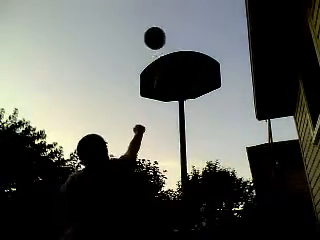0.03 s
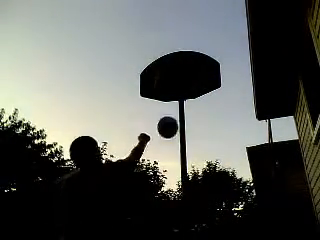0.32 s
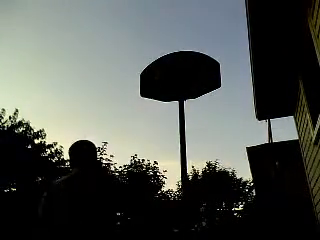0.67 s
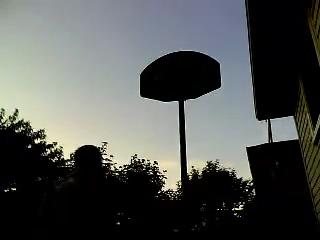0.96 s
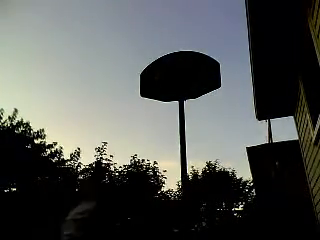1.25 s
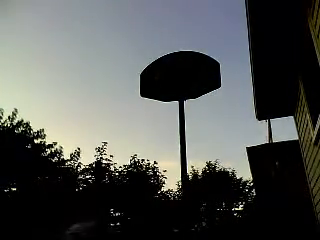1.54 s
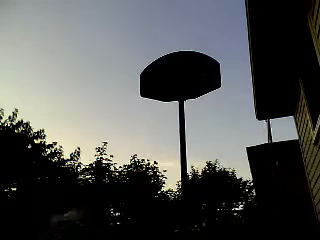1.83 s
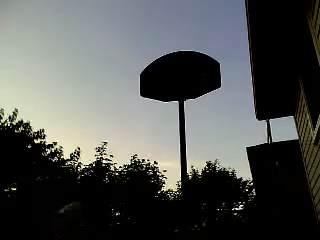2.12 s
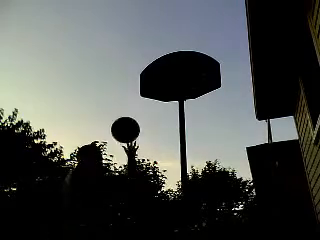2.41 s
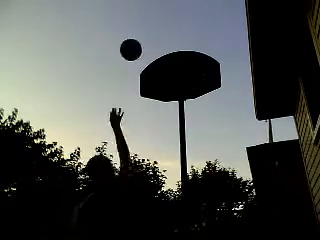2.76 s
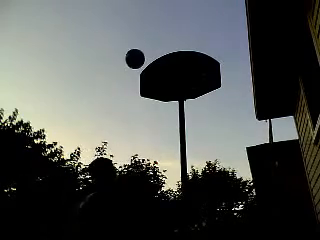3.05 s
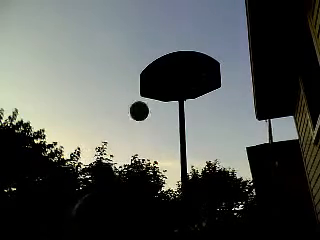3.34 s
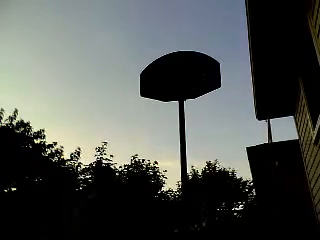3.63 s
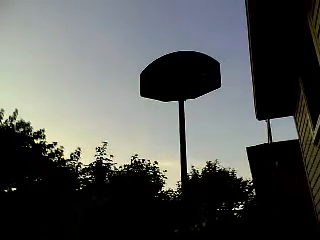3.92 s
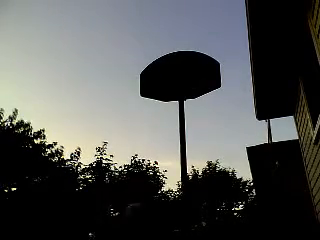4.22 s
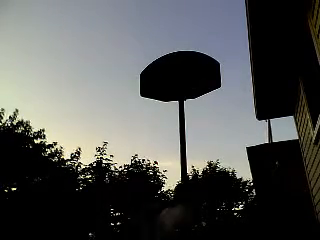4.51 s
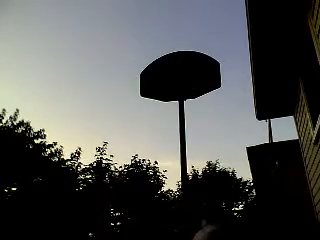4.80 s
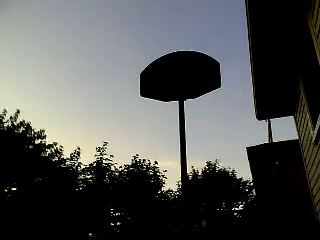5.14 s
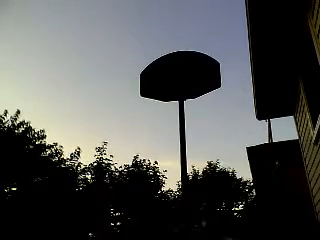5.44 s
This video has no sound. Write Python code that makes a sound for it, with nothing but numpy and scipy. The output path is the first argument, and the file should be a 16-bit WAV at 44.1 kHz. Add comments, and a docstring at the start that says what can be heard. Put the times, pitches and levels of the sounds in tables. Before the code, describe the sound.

In a backyard, a basketball thuds hard on the ground twice in quick succession, close enough to overload a small microphone slightly. Faint shoe scuffs and light hand taps on the ball follow, then a quiet stretch with only a couple of soft rubs. A third loud thud lands, and two sharp slaps on the ball finish it. A steady hiss runs underneath throughout.

```python
"""A backyard hoop, heard on a small camera's microphone over a steady hiss. Basketballs thud down hard
and close at 0.6 s and 0.8 s; each thud rings, scatters off walls and fence, overloads the microphone and
ducks its gain for a moment. From 1.1 s to 3.2 s shoes scuff and hands slap the ball, the house wall
throwing the slaps back. A third thud lands at 3.9 s. Two sharp slaps at 4.8 s and 5.4 s end the scene,
with a scuff and a soft knock between them."""
import sys
import numpy as np
from scipy import signal
from scipy.fft import rfft, irfft
from scipy.io import wavfile

SR = 44100
rng = np.random.default_rng(int(sys.argv[2]) if len(sys.argv) > 2 else 0)


def generate_wav(signal):
    """Clip the signal to [-1, 1] and save it as 16-bit WAV at the path in sys.argv[1]."""
    frames = np.transpose(np.atleast_2d(signal))
    scaled = np.clip(frames, -1, 1) * 32767
    pcm = np.round(scaled).astype(np.int16)
    wavfile.write(sys.argv[1], SR, pcm)


N = 245637
HIT_TIME = np.arange(SR // 2) / SR   # seconds since the start of one short sound
CUTOFF_HZ = 15900

# Steady hiss behind everything, spectrum: f/Hz, level/dB
HISS_SPECTRUM = [(25, -11), (90, -21), (145, -19), (215, -3), (330, -1.5), (420, -5.5), (750, -5.5),
                 (1300, -10), (3000, -13), (6000, -14.5), (7000, -18.5), (8000, -30), (10300, -43.5),
                 (12000, -54)]
# Grit in a rub, spectrum: f/Hz, level/dB
GRIT_SPECTRUM = [(200, -12), (900, -3.5), (1700, -1), (2700, 6), (3800, -4), (6500, -7), (8500, -22.5),
                 (11000, -48)]
# Crack of an impact on the ball, spectrum: f/Hz, level/dB
CRACK_SPECTRUM = [(100, 4.5), (700, -5.5), (2000, -2), (4500, -7.5), (7000, -13.5), (10000, -13),
                  (12000, -48)]
# Scatter off the walls and fence close by, spectrum: f/Hz, level/dB
SCATTER_SPECTRUM = [(30, -50), (120, -7), (240, -4), (450, 3.5), (750, 5), (1100, -5), (2000, -9),
                    (4500, -17.5), (7000, -29.5), (11000, -39), (16000, -67)]
# Dull tail that the yard returns after a thud, spectrum: f/Hz, level/dB
YARD_SPECTRUM = [(100, -20), (300, -3), (700, -7.5), (1500, -8), (3000, -13), (6000, -17), (11000, -52)]
# Shoes, clothes and the ball's skin rub: t/s, level/dB, half length/s, body f/Hz, grit/dB
RUBS = [(1.134, -31.5, 0.0089, 800, 4), (1.244, -31.5, 0.0057, 500, -0.5), (1.379, -26.5, 0.0094, 350, -12),
        (1.481, -30, 0.0067, 440, -10), (2.637, -31, 0.0082, 720, 7.5), (3.164, -36.5, 0.016, 750, -5),
        (5.063, -29.5, 0.015, 936, -2.5)]
# Hands and feet knock on the ball:
# t/s, rise/s, thump level/dB, thump f/Hz, thump t60/s, snap level/dB, snap f/Hz, snap t60/s
KNOCKS = [(1.121, 0.004, -13.5, 776, 0.034, -30, 2900, .02),
          (1.226, 0.0058, -3, 280, 0.027, -32, 2700, 0.038),
          (1.4145, 0.0019, -4, 646, 0.013, -15, 2260, 0.016),
          (2.702, 0.002, -40, 312, .03, -18, 3220, 0.015), (4.8023, 0.0015, 8, 241, 0.013, 13, 4250, 0.01),
          (5.154, 0.0043, -21, 324, 0.047, -45, 1490, .02),
          (5.4086, 0.0022, -13, 183, 0.027, 7.5, 2340, 0.017)]
# Modes of a ball and the ground under it: f/Hz, level/dB, t60/s
BALL_GROUND_MODES = [(194.2, -4, 0.16), (260.7, -9, 0.11), (319.7, -8, 0.083), (400.4, -3, 0.14),
                     (447.5, -5.5, 0.095), (557.4, -5.5, 0.095), (764, -7.5, 0.1), (864.6, -8, 0.15),
                     (933.6, -3, 0.14)]
# Balls land close to the microphone:
# t/s, level/dB, rise/s, hold by near reflections/s, fall t60/s, ring f/Hz, ring/dB, bass/dB, crack/dB
LANDINGS = [(0.6336, 11, 0.017, 0.034, 0.13, 738, -6, 0.5, -2),
            (0.829, 8.5, 0.0091, 0.047, 0.047, 735, -2, 3.5, 1.5),
            (3.8504, 9.5, 0.014, 0.052, 0.1, 616, 3, -11.5, -17)]


def from_db(db):
    """Decibels to gain."""
    return 10 ** (np.asarray(db) / 20)


def unit_power(x):
    """Scale to an RMS of 1."""
    return x / np.sqrt(np.mean(x ** 2) + 1e-20)


def low_pass(x, hz, order):
    """Butterworth low-pass, its corner at CUTOFF_HZ at most."""
    return signal.sosfilt(signal.butter(order, min(hz, CUTOFF_HZ), fs=SR, output="sos"), x)


def high_pass(x, hz):
    """Butterworth high-pass."""
    return signal.sosfilt(signal.butter(2, hz, "high", fs=SR, output="sos"), x)


def coloured(x, spectrum):
    """Shape a signal with the listed spectrum, at unit power."""
    hz, db = np.transpose(spectrum)
    bin_hz = np.maximum(np.fft.rfftfreq(len(x), 1 / SR), 1)
    gain = from_db(np.interp(np.log(bin_hz), np.log(hz), db))
    return unit_power(irfft(rfft(x) * gain, len(x)))


def noise(spectrum, size=len(HIT_TIME)):
    """Noise of unit power with the given colour."""
    return coloured(rng.standard_normal(size), spectrum)


def resonant_noise(hz, width_hz):
    """Dense random contacts through one resonance, at unit power."""
    radius = np.exp(-np.pi * width_hz / SR)
    poles = [1, -2 * radius * np.cos(2 * np.pi * hz / SR), radius ** 2]
    return unit_power(signal.lfilter([1, 0, -1], poles, rng.standard_normal(len(HIT_TIME))))


def decay(t60):
    """Exponential fall from 1, by 60 dB in t60 seconds."""
    return from_db(-60 * HIT_TIME / t60)


def held(hold_s, t60):
    """Stay at 1, then decay."""
    return np.interp(HIT_TIME - hold_s, HIT_TIME, decay(t60))


def build_up(rise_s, power=2):
    """Rise from 0 to 1; a higher power starts more gently."""
    return np.minimum(HIT_TIME / rise_s, 1) ** power


def ring(hz, t60):
    """One struck mode."""
    return np.sin(2 * np.pi * hz * HIT_TIME) * decay(t60)


def blurred_ring(hz, width_hz):
    """A resonance whose wandering phase spreads its line over the given width."""
    wander = np.cumsum(rng.standard_normal(len(HIT_TIME))) * np.sqrt(2 * np.pi * width_hz / SR)
    return np.sin(2 * np.pi * hz * HIT_TIME + wander)


def add(track, start_s, sound):
    """Mix a sound into the track from start_s on."""
    start = round(start_s * SR)
    track[start:start + len(sound)] += sound[:N - start]


def hiss(level_db=-32):
    """The bed of the scene: steady noise, fullest in the low mids."""
    return from_db(level_db) * noise(HISS_SPECTRUM, size=N)


def wall_echo(x, delay_s=0.013, rise_s=0.013, t60=0.12, level_db=-20, top_hz=2600):
    """The house wall and what stands along it throw back a late, dull, smeared copy."""
    paths = rng.standard_normal(len(HIT_TIME)) * build_up(rise_s) * decay(t60)
    response = low_pass(paths / np.linalg.norm(paths), top_hz, order=3)
    out = np.zeros(N)
    add(out, delay_s, from_db(level_db) * signal.fftconvolve(x, response))
    return out


def scuffs(body_width_hz=100.0, grain_spread_db=2.0, grains_per_s=900.0):
    """Each brief rub swells and fades: a dull body with uneven grit on top."""
    out = np.zeros(N)
    middle_s = HIT_TIME.mean()
    grain_index = (HIT_TIME * grains_per_s).astype(int)
    for peak_s, level_db, half_s, body_hz, grit_db in RUBS:
        stroke = np.exp(-((HIT_TIME - middle_s) / half_s) ** 2 / 2)
        sizes = rng.standard_normal(len(HIT_TIME))[grain_index]
        grains = rng.standard_normal(len(HIT_TIME)) * from_db(grain_spread_db * sizes)
        grit = from_db(grit_db) * coloured(grains, GRIT_SPECTRUM)
        body = low_pass(resonant_noise(body_hz, body_width_hz), 2 * body_hz, order=2)
        add(out, peak_s - middle_s, from_db(level_db) * stroke * (body + grit))
    return out


def slaps(crack_db=-2.5, scatter_db=-20.5, scatter_t60=0.078, top_at_0_db_hz=7000, db_per_octave=32):
    """Skin or sole meets rubber: a damped thump, a short, bright snap and faint scatter from close by."""
    out = np.zeros(N)
    for start_s, rise_s, thump_db, thump_hz, thump_t60, snap_db, snap_hz, snap_t60 in KNOCKS:
        thump = from_db(thump_db) * ring(thump_hz, thump_t60)
        top_hz = top_at_0_db_hz * 2 ** (snap_db / db_per_octave)   # a softer snap is duller
        crack = from_db(crack_db) * low_pass(high_pass(noise(CRACK_SPECTRUM), hz=40), top_hz, order=2)
        snap_ring = blurred_ring(snap_hz, width_hz=0.093 * snap_hz)
        snap = from_db(snap_db) * decay(snap_t60) * (snap_ring + crack)
        scatter = from_db(thump_db + scatter_db) * noise(SCATTER_SPECTRUM) * decay(scatter_t60)
        add(out, start_s, build_up(rise_s) * (thump + snap + scatter))
    return out


def ball_modes(bass_db, bass_hz=252.0):
    """Ball and ground ring together; bass_db lifts or lowers the modes below about bass_hz."""
    modes = 0
    for k, (hz, level_db, t60) in enumerate(BALL_GROUND_MODES):
        bass_share = 1 / (1 + (hz / bass_hz) ** 8)
        modes += (-1) ** k * from_db(level_db + bass_db * bass_share) * ring(hz, t60)
    return modes


def thuds(sag_t60=0.3, ring_width_hz=74.0, crack_t60=0.16, yard_db=-17.5, yard_t60=0.23):
    """Each ball lands close, cracks and rings; near reflections crowd in, stop and leave a faint tail."""
    out = np.zeros(N)
    for start_s, level_db, rise_s, hold_s, fall_t60, ring_hz, ring_db, bass_db, crack_db in LANDINGS:
        # the level only sags while reflections keep arriving, then falls fast
        crowding = decay(sag_t60) * held(hold_s, fall_t60)
        modes = ball_modes(bass_db) * crowding ** 0.25   # the modes fall with them, more gently
        scatter = noise(SCATTER_SPECTRUM)
        main_ring = from_db(ring_db) * blurred_ring(ring_hz, ring_width_hz)
        crack = from_db(crack_db) * noise(CRACK_SPECTRUM) * decay(crack_t60)
        near = from_db(level_db) * (modes + crowding * (scatter + main_ring + crack))
        yard = from_db(yard_db) * noise(YARD_SPECTRUM) * held(hold_s, yard_t60)   # as loud for each thud
        flattening = build_up(rise_s, power=2.9)   # a ball touches at one point, so force starts gently
        add(out, start_s, flattening * (near + yard))
    return out


def scene():
    """The backyard from one microphone position: hiss, the player, and balls landing close by."""
    background = hiss()
    landings = thuds()
    handling = slaps()
    return (background + scuffs() + wall_echo(handling) + handling + landings)[None, :]


def gain_control(x, threshold=1.0, hold_s=0.16, depth_db=2.5, knee_s=0.0015, smooth_s=0.0046):
    """Time spent in overload pulls the camera's gain down; it is held briefly and then let go."""
    t = np.arange(N) / SR
    overload_s = np.cumsum(np.abs(x[0]) > threshold) / SR
    recent_s = overload_s - np.interp(t - hold_s, t, overload_s)
    wanted_cut_db = depth_db * recent_s / (recent_s + knee_s)
    pole = np.exp(-1 / (smooth_s * SR))
    cut_db = signal.lfilter([1 - pole], [1, -pole], wanted_cut_db)
    return x * from_db(-cut_db)


def record(dry, treble_cut_hz=10800.0, ceiling=0.66, asymmetry=0.037, dull_hz=8200.0):
    """The top treble is cut steeply before the input ducks and clips; then the top is dulled and cut."""
    band_limited = low_pass(dry, treble_cut_hz, order=10)
    ducked = gain_control(band_limited)
    rail = ceiling * (1 - asymmetry * np.sign(ducked))   # positive peaks flatten a little sooner
    clipped = ducked / (1 + (ducked / rail) ** 8) ** (1 / 8)
    dulled = low_pass(clipped, dull_hz, order=1)
    steep_cut = signal.ellip(10, 0.1, 80, CUTOFF_HZ, fs=SR, output="sos")
    return signal.sosfilt(steep_cut, dulled)


dry = scene()
out = record(dry)
generate_wav(out)
```